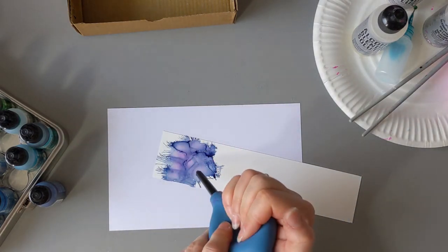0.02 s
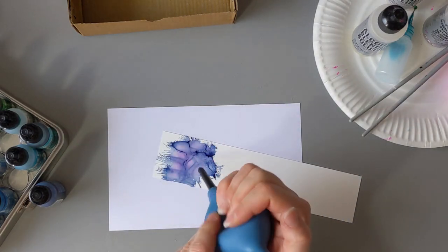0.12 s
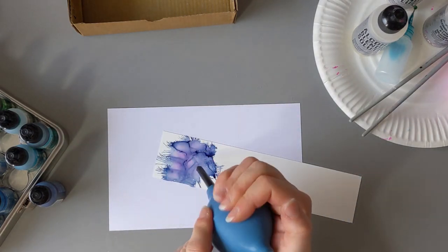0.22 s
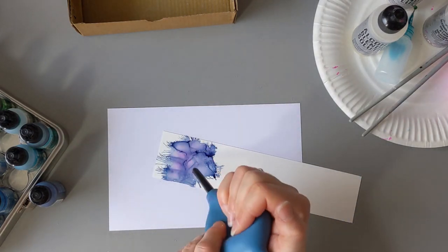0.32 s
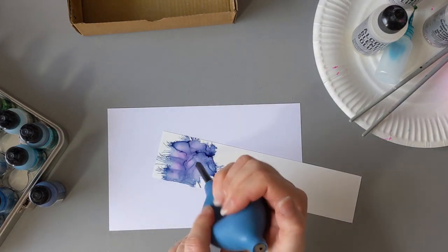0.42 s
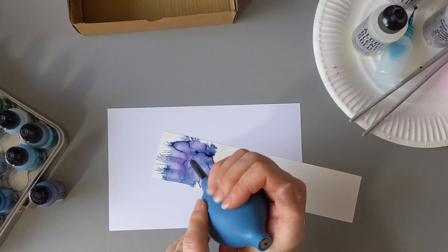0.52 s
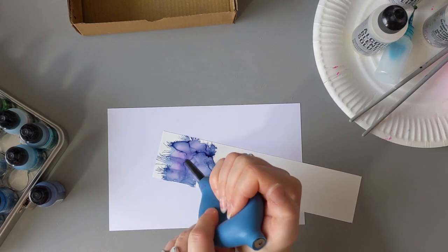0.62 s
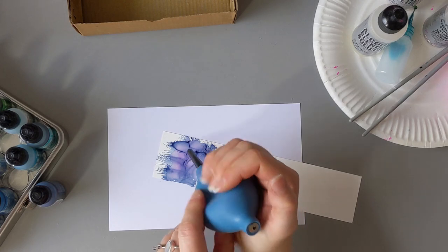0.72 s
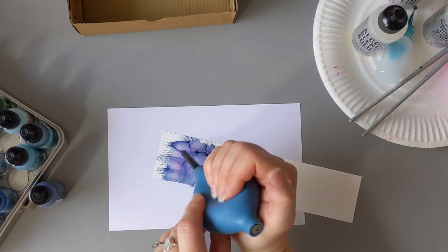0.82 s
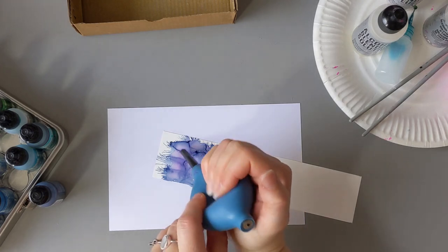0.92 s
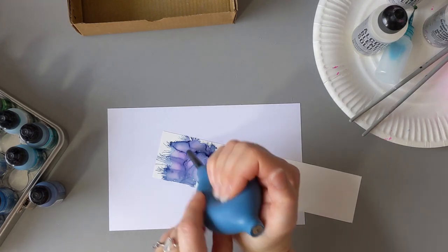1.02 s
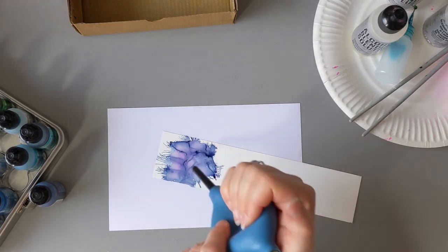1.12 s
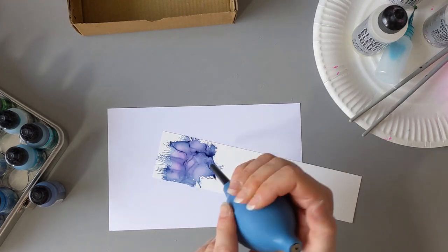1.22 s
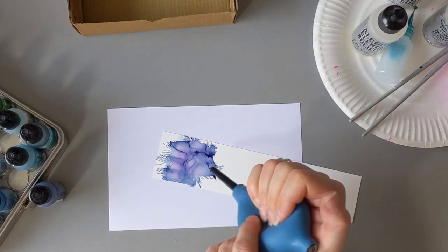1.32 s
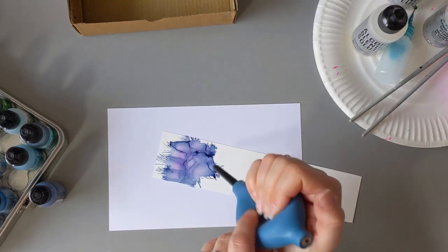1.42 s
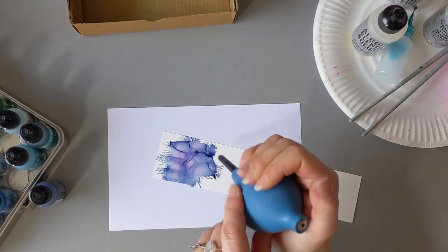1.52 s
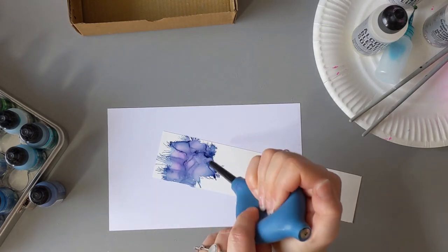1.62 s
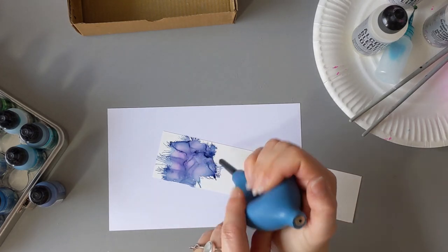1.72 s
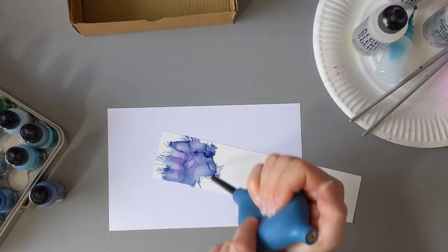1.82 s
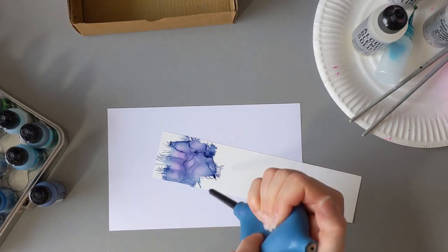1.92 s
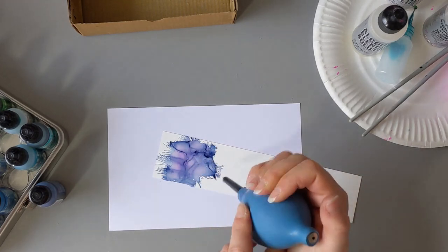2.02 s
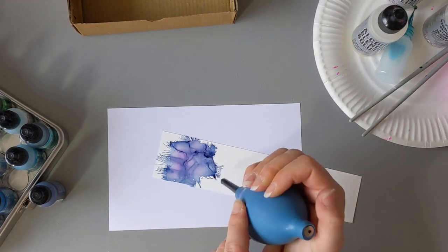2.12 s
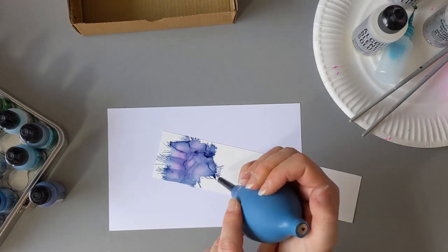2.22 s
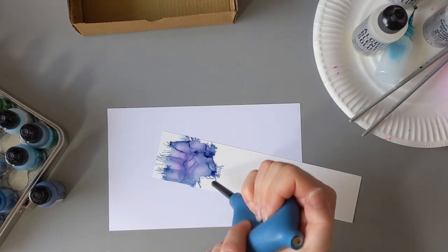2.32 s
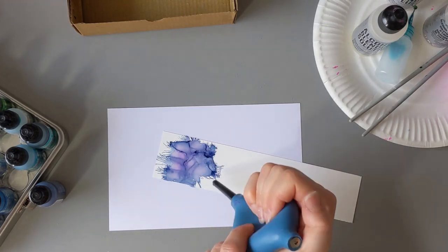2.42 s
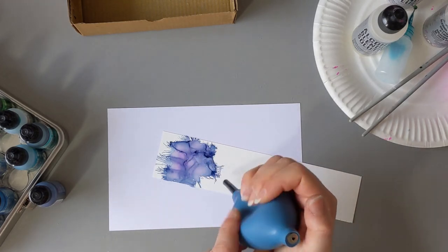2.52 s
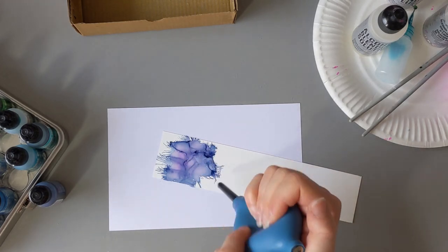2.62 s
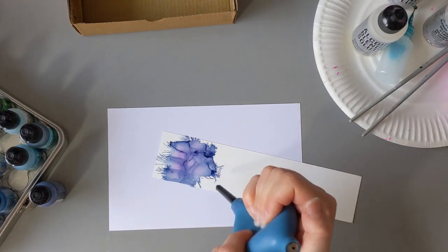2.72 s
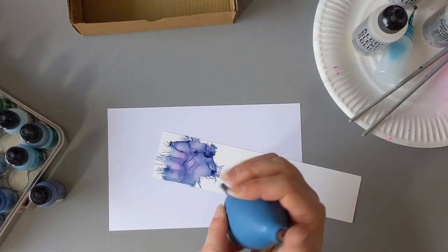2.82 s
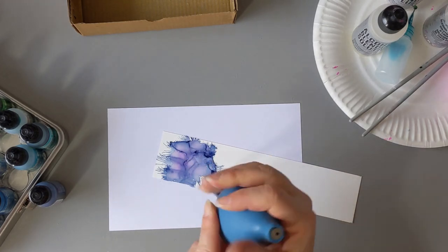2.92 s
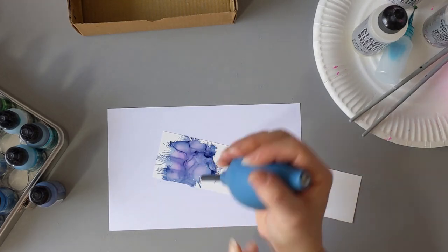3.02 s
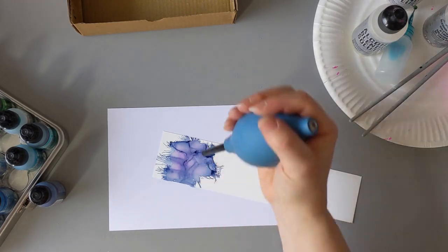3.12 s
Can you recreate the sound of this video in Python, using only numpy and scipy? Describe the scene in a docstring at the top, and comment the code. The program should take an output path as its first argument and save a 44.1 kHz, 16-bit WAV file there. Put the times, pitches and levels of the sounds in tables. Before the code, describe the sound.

Squeezed rubber air blower: rapid sharp puffs, whistly edge, valve ticks and soft refilling slurps

```python
"""A rubber bulb blower is squeezed ten times over wet ink on paper, at a table in a small room.
A refill comes first: the inlet valve ticks and knocks open and air hisses and slurps in through its gap.
Each squeeze then drives a swelling noise jet with a climbing whistle; most end in a soft thump, a short
sliding tone with a low push, as the bulb's walls meet. The valve flips and a softer hiss refills the bulb.
Two low thuds fall between squeezes, two more under the last thumps; a low noise floor lies beneath."""
import sys
import numpy as np
from scipy import signal
from scipy.fft import rfft, irfft
from scipy.io import wavfile
from scipy.ndimage import map_coordinates

SR = 44100
rng = np.random.default_rng(int(sys.argv[2]) if len(sys.argv) > 2 else 0)


def store_pcm(level_fs):
    """Save levels as 16-bit WAV."""
    pcm = np.round(np.clip(level_fs, -1, 1) * 32767).astype(np.int16)
    wavfile.write(sys.argv[1], SR, np.atleast_2d(pcm).T)


N = 141120


def amp(db):
    """Decibels to gain."""
    return 10 ** (np.asarray(db) / 20)


def evened(x):
    """Scales to rms 1."""
    return x / np.sqrt(np.mean(x ** 2) + 1e-20)


def read(points, hz):
    """Reads a table on a log-frequency axis."""
    f, value = np.transpose(points)
    return np.interp(np.log(hz + 1), np.log(f + 1), value)


def add(mix, start_s, sound):
    """Mixes a sound in at a time in seconds."""
    part = mix[..., max(round(start_s * SR), 0):][..., :sound.shape[-1]]
    part += sound[..., :part.shape[-1]]


def flutter(per_s):
    """Random wobble of rms 1: noise under a Gaussian low-pass of the given rate."""
    hz = np.fft.rfftfreq(N, 1 / SR)
    return evened(irfft(rfft(rng.standard_normal(N)) * np.exp(-(hz / per_s) ** 2), N))


def sway():
    """The slow wander of a hand, rms 1: eight sines of 0.5 to 4 Hz at random phases."""
    t = np.arange(N) / SR
    return evened(sum(np.sin(2 * np.pi * (f * t + rng.random())) for f in np.geomspace(.5, 4, 8)))


def noise(colour, same, side=None, lead=None):
    """Steady stereo noise of a given colour, likeness, balance and phase lead."""
    hz = np.fft.rfftfreq(N, 1 / SR)
    a, b = rfft(rng.standard_normal((2, N)))
    likeness = np.clip(read(same, hz), 0, 1)
    z = np.array([a, likeness * a + np.sqrt(1 - likeness ** 2) * b])
    if side is not None:
        pan, turn = amp(read(side, hz) / 2), read(lead, hz)
        z = z * np.array([pan * np.exp(1j * turn), 1 / pan])
        z = z / np.sqrt(pan ** 2 + pan ** -2 + 2 * likeness * np.cos(turn))  # the colour holds for left + right
    return evened(irfft(z * amp(read(colour, hz)), N))


def resonate(x, hz, width_hz):
    """A resonance of gain 1 that follows a pitch curve: shift down to 0 Hz, low-pass, shift back."""
    turn = np.exp(2j * np.pi * np.cumsum(hz * np.ones(N)) / SR)
    r = np.exp(-np.pi * width_hz / SR)
    return 2 * (turn * signal.lfilter([(1 - r) ** 2], [1, -2 * r, r * r], x / turn)).real


def hiss(air, body, treble):
    """Turbulent air: body and treble follow their own envelopes and flutter together."""
    treble_hz, flutter_db, flutter_per_s = 7900, 1.0, 150
    hz = np.fft.rfftfreq(N, 1 / SR)
    low = irfft(rfft(air) / (1 + (hz / treble_hz) ** 6), N)
    return (low * body + (air - low) * treble) * amp(flutter_db * flutter(flutter_per_s))


def noise_floor():
    """Quiet steady noise, strongest in the lows, where left and right are most alike."""
    floor_db = -65
    # Noise colour. Each row: frequency in Hz, relative level in dB.
    floor_colour = [(22, -19), (50, -1.5), (70, -14), (114, -12.5), (153, -20.5), (416, -25), (531, -22.5),
                    (775, -29.5), (2100, -34), (16000, -45)]
    # Left-right likeness. Each row: frequency in Hz, likeness 0-1.
    floor_likeness = [(100, 0.94), (600, 0.52), (3000, 0.052)]
    return amp(floor_db) * noise(floor_colour, floor_likeness)


def room(x):
    """A short diffuse tail, each band dying at its own speed."""
    rise_s = 0.0036
    # Reverberation time. Each row: frequency in Hz, t60 in seconds.
    room_t60 = [(150, 0.27), (500, 0.18), (2000, 0.3), (15000, 0.2)]
    hz, t, z = signal.stft(rng.standard_normal((2, SR // 2)), SR, nperseg=256)
    decay = amp(-60 * t / read(room_t60, hz)[:, None])
    tail = signal.istft(z * decay, SR, nperseg=256)[1]
    tail *= np.minimum(np.arange(tail.shape[1]) / SR / rise_s, 1)
    return signal.fftconvolve(x, tail / np.linalg.norm(tail[0]), axes=1)[:, :N]


def table(x, count=5):
    """A few quick reflections, 0.7 to 6 ms late, from the table top and the things on it."""
    taps = np.zeros((2, SR // 50))
    for side in taps:
        delays = rng.integers(SR // 1500, SR // 160, count)
        side[delays] = rng.choice([-1., 1.], count) / np.sqrt(count)
    return signal.fftconvolve(x, taps, axes=1)[:, :N]


def off_paper(x):
    """Adds the close reflection from the paper, its delay swaying with the hand."""
    echo_s, echo_gain, sway_share = 0.000986, 0.22, 0.069
    back = np.arange(N) - echo_s * SR * (1 + sway_share * sway())
    return x + echo_gain * np.array([map_coordinates(side, [back], order=3) for side in x])


def low_thuds():
    """Soft low thuds, each a sine that swells and fades quickly."""
    thud_hz, peak_s = 120, 0.0069
    # Two thuds on their own between squeezes, two under the last wall contacts.
    # Each row: start in seconds, relative level in dB.
    thuds = [(1.083, -47.5), (1.444, -54.5), (2.632, -54), (2.901, -51)]
    out, t = np.zeros(N), np.arange(SR // 10) / SR
    thud = t / peak_s * np.exp(1 - t / peak_s) * np.sin(2 * np.pi * thud_hz * t)
    for start_s, db in thuds:
        add(out, start_s, amp(db) * thud)
    return out


def valve():
    """The rubber flap opens or shuts: a ragged modal knock, different each time, and a tiny spit of air."""
    tick_peak_s, peel_s, chatter = 0.001553, 0.004, 0.11
    # Valve flips open. Each row: time in seconds, knock peak in dB, relative tick level in dB.
    valve_opens = [(0.015, -56, -39.5), (.336, -45.5, -37.5), (0.631, -45, -36.5), (0.885, -40, -40),
                   (1.101, -38.5, -39), (1.365, -39, -43), (1.636, -42.5, -39), (1.939, -42, -37),
                   (2.367, -39, -33), (2.669, -40, -48)]
    # Valve snaps shut. Each row: time in seconds, knock peak in dB, relative tick level in dB.
    valve_shuts = [(.172, -50.5, -54), (0.461, -56, -48), (0.754, -56, -39.5), (1.002, -51.5, -54),
                   (1.227, -47.5, -44), (2.009, -64, -38), (2.531, -50.5, -37)]
    # Flap modes. Each row: frequency in Hz, relative level in dB, t60 in seconds.
    flap_modes = [(393, 0, 0.0099), (950, -6, 0.0033), (1250, 0.5, 0.0054)]
    out, t = np.zeros((2, N)), np.arange(SR // 20) / SR
    flap = sum(amp(db - 60 * t / t60_s) * np.sin(2 * np.pi * hz * t) for hz, db, t60_s in flap_modes)
    tick_shape = t / tick_peak_s * np.exp(1 - t / tick_peak_s)
    for flip_s, knock_db, tick_db in valve_opens + valve_shuts:
        peel = (t == 0) + chatter * rng.standard_normal(len(t)) * np.exp(-t / peel_s)
        knock = signal.fftconvolve(flap, peel)[:len(t)]
        tick = signal.lfilter([1], [1, -.4], rng.standard_normal((2, len(t)))) * tick_shape
        add(out, flip_s, amp(knock_db) * knock / abs(knock).max())
        add(out, flip_s - tick_peak_s, amp(tick_db) * tick / 4)  # envelope peaks at the flip
    return out


def refill():
    """The bulb springs back and draws air in one arch; a fluttering slurp in the valve gap sinks in pitch."""
    open_power, close_power, brighten = 1.17, 2.6, 0.26  # treble grows faster than the flow
    slurp_hz, slurp_fall_share, slurp_width_hz = 5560, 0.66, 3070
    slurp_db, slurp_flutter_db, slurp_flutter_per_s = -4, 3, 70
    # Refills. Each row: start, fullest and end in seconds, relative level in dB, treble in dB.
    refills = [(.002, 0.05, 0.14, -48, -1.5), (0.315, 0.383, 0.44, -45.5, -1.5),
               (0.615, 0.661, 0.75, -47.5, 1.5), (0.86, 0.917, 1.012, -52, 5.5),
               (1.058, 1.152, 1.18, -47.5, 4), (1.333, 1.435, 1.44, -44, 1),
               (1.615, 1.686, 1.723, -41.5, 2), (1.867, 1.917, 1.973, -40.5, 5),
               (2.353, 2.412, 2.496, -42.5, 4), (2.657, 2.691, 2.815, -42.5, 0.5),
               (2.98, 3.175, 3.2, -69.5, -10)]
    # Hiss colour. Each row: frequency in Hz, relative level in dB.
    inlet_colour = [(300, -15.5), (1400, -10.5), (2400, -6), (4000, -6), (6000, -3.5), (8000, -5),
                    (9000, 0.5), (13000, 0), (16000, -3.5)]
    # Balance. Each row: frequency in Hz, left minus right in dB.
    inlet_side = [(1500, 1), (4500, 3.5), (7000, 4.5), (9500, 2), (11500, -2), (14500, -8.5)]
    # Left-right likeness. Each row: frequency in Hz, likeness 0-1.
    inlet_likeness = [(500, 0.73), (4000, 0.14), (6000, 0.22), (10500, 0.077), (15000, 0.73)]
    # Left's phase lead. Each row: frequency in Hz, lead in radians.
    inlet_lead = [(1500, 0.77), (5000, 1), (8000, 2.65)]
    body, treble, slurp = np.zeros((3, N))
    pitch_hz = np.full(N, float(slurp_hz))
    for start_s, top_s, end_s, db, treble_db in refills:
        t = np.arange(start_s, end_s, 1 / SR)
        progress = np.interp(t, [start_s, top_s, end_s], [0, .5, 1])
        arch = abs(np.sin(np.pi * progress))
        flow = arch ** np.where(t < top_s, open_power, close_power)
        add(body, start_s, amp(db) * flow)
        add(treble, start_s, amp(db + treble_db) * flow ** (1 + brighten))
        add(slurp, start_s, amp(db + slurp_db) * arch ** 3 * progress)
        add(pitch_hz, start_s, -slurp_hz * slurp_fall_share * progress ** 2)
    gap = evened(resonate(noise(inlet_colour, inlet_likeness), pitch_hz, slurp_width_hz))
    gap = gap * amp(slurp_flutter_db * flutter(slurp_flutter_per_s))
    air = noise(inlet_colour, inlet_likeness, inlet_side, inlet_lead)
    return hiss(air, body, treble) + slurp * gap


def thumps():
    """The collapsing cavity rings, sliding up, over a low push of air; the walls scuff and close with a pat."""
    ring_rise_s, ring_decay_s, ring_sag_share, ring_glide_s = 0.0016, 0.0046, 0.98, 0.0012
    push_hz, push_decay_s = 55, 0.0061
    note_hz, note_decay_s, note_db = 301.5, 0.0096, -11  # a dull low note that rings with each contact
    scuff_cut_hz, scuff_db = 680, -27
    pat_after_s, pat_width_s = 0.00712, 0.0014  # the rest of the wall closes a moment later
    # Wall contacts. Each row: time in seconds, ring level in dB, settled ring pitch in Hz,
    # push level in dB, pat level in dB (levels relative).
    wall_contacts = [(0.2562, -49, 535, -42, -39.5), (0.5518, -33, 533, -33.5, -51.5),
                     (0.8395, -23, 538, -41, -56), (1.3104, -32, 534, -32.5, -54),
                     (1.5876, -34, 515, -33.5, -56), (1.8494, -39, 532, -36.5, -46),
                     (2.1086, -34, 536, -35, -48), (2.6314, -46.5, 490, -38.5, -58),
                     (2.9010, -48.5, 196, -40, -55)]
    rings, pushes = np.zeros((2, N))
    t = np.arange(SR // 8) / SR
    dull = signal.butter(4, scuff_cut_hz, fs=SR, output="sos")
    rise = 1 - np.exp(-t / ring_rise_s)
    shape = rise * np.exp(-t / ring_decay_s)
    low_note = amp(note_db) * rise * np.exp(-t / note_decay_s) * np.sin(2 * np.pi * note_hz * t)
    pat = np.exp(-((t - pat_after_s) / pat_width_s) ** 2)
    push = signal.sosfilt(dull, np.cos(2 * np.pi * push_hz * t + np.pi / 3)) * np.exp(-t / push_decay_s)
    for meet_s, ring_db, ring_hz, push_db, pat_db in wall_contacts:
        turns = np.cumsum(ring_hz * (1 - ring_sag_share * np.exp(-t / ring_glide_s))) / SR
        cavity = shape / shape.max() * np.sin(2 * np.pi * turns)
        scuff = shape * evened(signal.sosfilt(dull, rng.standard_normal(len(t))))
        add(rings, meet_s, -amp(ring_db) * (cavity + low_note) + amp(scuff_db + ring_db / 2) * scuff)
        add(rings, meet_s, amp(pat_db) * pat)
        add(pushes, meet_s, -amp(push_db) * push)
    return rings, pushes


def jet():
    """The nozzle's hiss swells, surges as the bulb empties and stops short; a breathy edge tone climbs."""
    rise_s, stop_s, surge_s, surge_share = 0.024, 0.0082, 0.019, 0.38  # surge: share of the crescendo's dB
    brighten = 0.67  # treble grows faster than the flow
    whistle_width_hz, whistle_db, whistle_left_db = 590, -4, -23
    pipe_width_hz, pipe_drift_share = 260, 0.035
    # Squeezes. Each row: start and end in seconds, relative jet level in dB, crescendo in dB, treble in dB,
    # whistle's first and last pitch in Hz.
    squeezes = [(0.161, 0.266, -35.5, 6.5, -2.5, 13200, 13500), (.455, 0.561, -35, 7, -3.5, 11800, 14900),
                (0.744, 0.844, -36.5, 5.5, -3, 11300, 13700), (0.995, 1.076, -38, 3, -3, 12000, 12400),
                (1.217, 1.317, -34.5, 8, -0.5, 9600, 15700), (1.495, 1.595, -33.5, 8, 1, 9300, 16800),
                (1.758, 1.856, -35, 3, 0, 10400, 16800), (2.009, 2.117, -35, 7, 1, 9300, 17100),
                (2.519, 2.64, -35, 8, -1.5, 9300, 15200), (2.8, 2.907, -34, 10, 0, 7900, 16300)]
    # Nozzle resonances, strongest early in a squeeze. Each row: frequency in Hz, relative level in dB.
    nozzle_modes = [(3050, -21), (6050, -11), (7150, -12)]
    # Hiss colour. Each row: frequency in Hz, relative level in dB.
    jet_colour = [(180, -61), (300, -14.5), (550, -18.5), (1300, -19), (1750, -22), (2170, -12),
                  (2980, -11), (4370, -13), (6100, -7.5), (8500, -7), (11100, -2.5), (13800, -1),
                  (16000, -3)]
    # Balance. Each row: frequency in Hz, left minus right in dB.
    jet_side = [(1500, 1.5), (6000, 1.5), (8000, 4), (10000, -2.5), (11200, 0), (13000, -15), (16000, -6.5)]
    # Left-right likeness. Each row: frequency in Hz, likeness 0-1.
    jet_likeness = [(500, 0.86), (3000, 0.72), (5000, 0.63), (9500, 0.64), (13000, 0.98)]
    # Left's phase lead. Each row: frequency in Hz, lead in radians.
    jet_lead = [(3000, 0), (4800, 1), (8000, 0)]
    body, treble, early = np.zeros((3, N))
    pitch_hz = np.full(N, SR / 4)
    for start_s, end_s, db, swell_db, treble_db, first_hz, last_hz in squeezes:
        length_s = end_s - start_s
        t = np.arange(0, length_s + .1, 1 / SR)
        left_s, over_s = np.maximum(length_s - t, 0), np.maximum(t - length_s, 0)
        to_go = left_s / length_s
        surge_db = surge_share * swell_db * (np.exp(-left_s / surge_s) - 1)
        flow = (1 - np.exp(-t / rise_s)) * np.exp(-over_s / stop_s)
        flow *= amp(-swell_db * to_go ** 2 / 2 + surge_db)
        add(body, start_s, amp(db) * flow)
        add(treble, start_s, amp(db + treble_db - brighten * swell_db * to_go) * flow)
        add(early, start_s, amp(db) * flow * to_go)
        pitch_hz[round(start_s * SR):][:len(t)] = last_hz + (first_hz - last_hz) * to_go
    tone = evened(resonate(rng.standard_normal(N), pitch_hz, whistle_width_hz))
    whistle = amp(whistle_db) * treble * tone
    pipe = np.zeros((2, N))
    for hz, db in nozzle_modes:
        drifting_hz = hz * (1 + pipe_drift_share * sway())
        pipe += amp(db) * evened(resonate(rng.standard_normal((2, N)), drifting_hz, pipe_width_hz))
    air = hiss(noise(jet_colour, jet_likeness, jet_side, jet_lead), body, treble)
    return off_paper(air + early * pipe) + whistle * amp([[whistle_left_db], [0]])


def scene():
    """Blower, table and room over the noise floor."""
    table_db, hiss_room_db, thump_room_db = -8, -8.5, -9
    air = jet() + refill() + valve()
    rings, pushes = thumps()
    boom = room(np.array([rings, rings]))
    boom = boom[0] + 0.4 * np.array([[1], [-1]]) * boom[1]  # narrowed
    bulb = rings + pushes + low_thuds() + amp(thump_room_db) * boom
    bulb = bulb * amp([[.4], [-.4]])  # left and right gain in dB
    return air + amp(table_db) * table(air) + amp(hiss_room_db) * room(air) + bulb + noise_floor()


def record(dry):
    """High-pass against rumble, then a steep linear-phase low-pass."""
    rumble_cut_hz, edge_hz = 33, 16020
    lean = signal.sosfilt(signal.butter(2, rumble_cut_hz, "high", fs=SR, output="sos"), dry)
    band_limit = signal.firwin(511, edge_hz, window=("kaiser", 9), fs=SR)
    return signal.oaconvolve(lean, band_limit[None], "same")


dry = scene()
out = record(dry)
store_pcm(out)
```